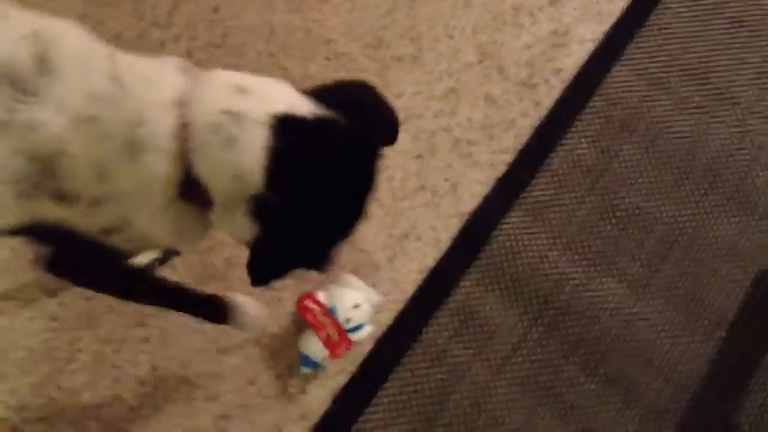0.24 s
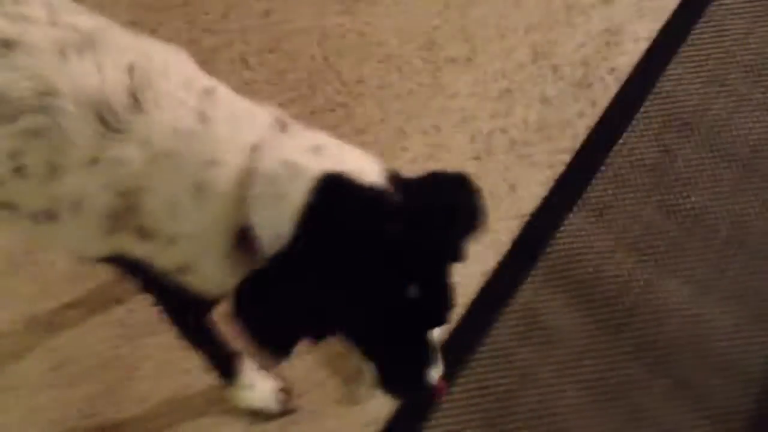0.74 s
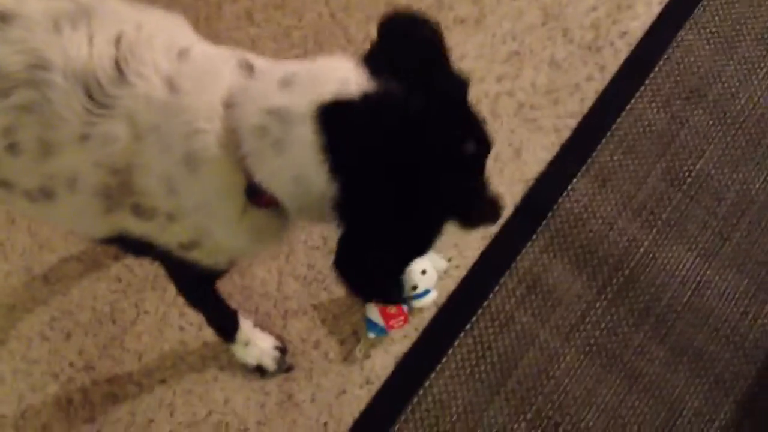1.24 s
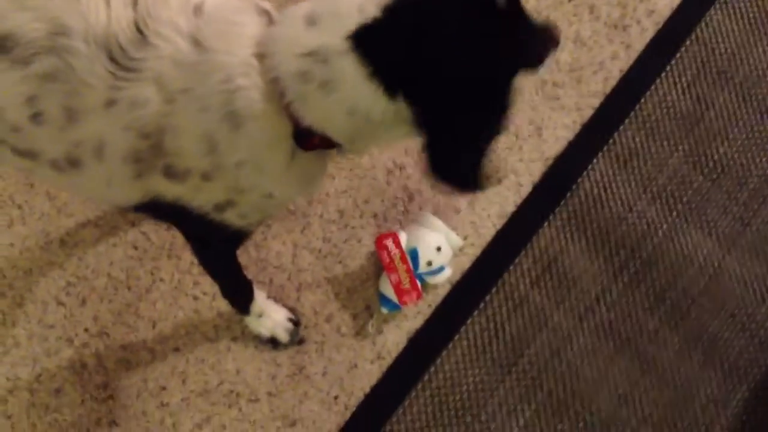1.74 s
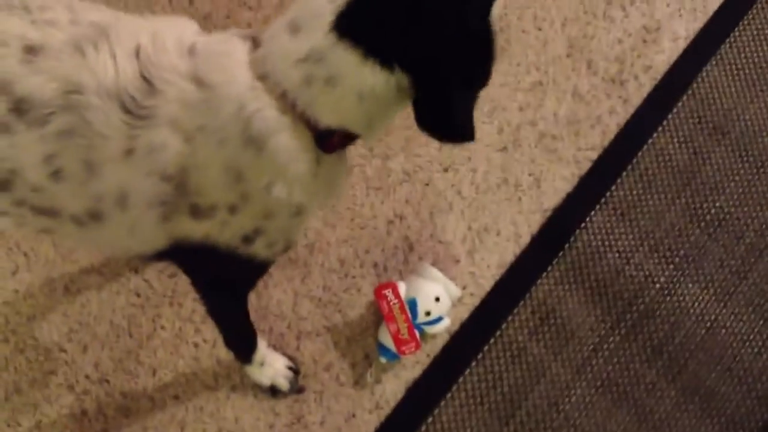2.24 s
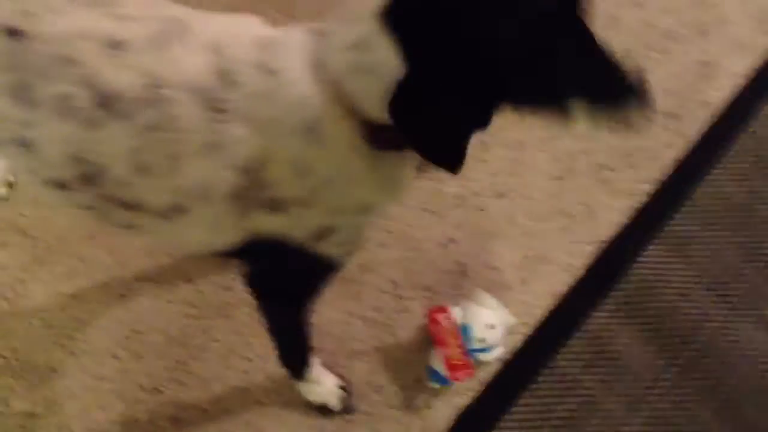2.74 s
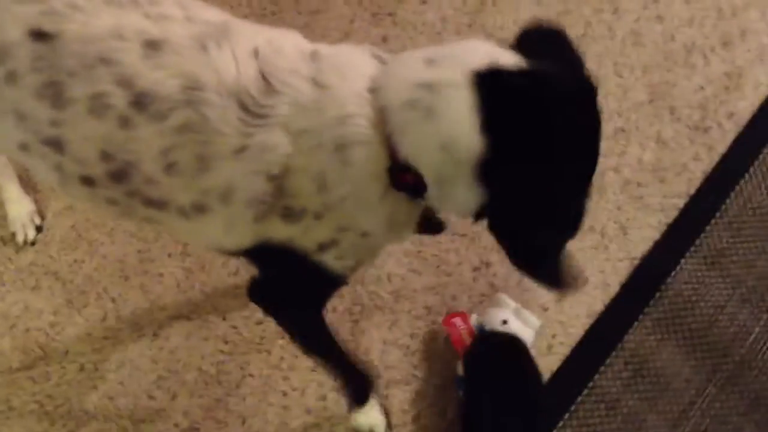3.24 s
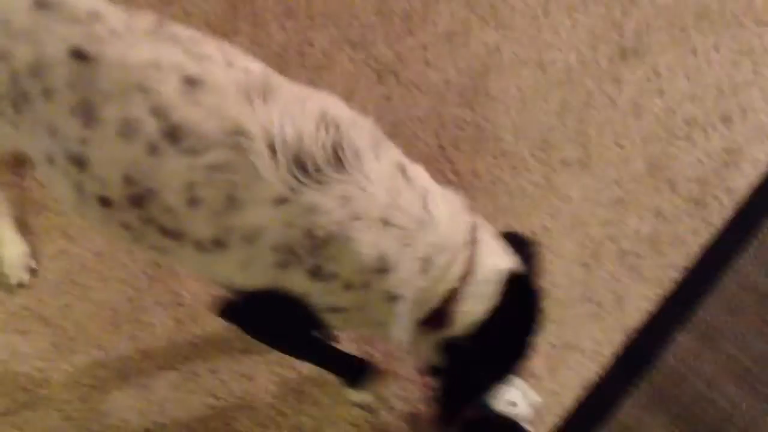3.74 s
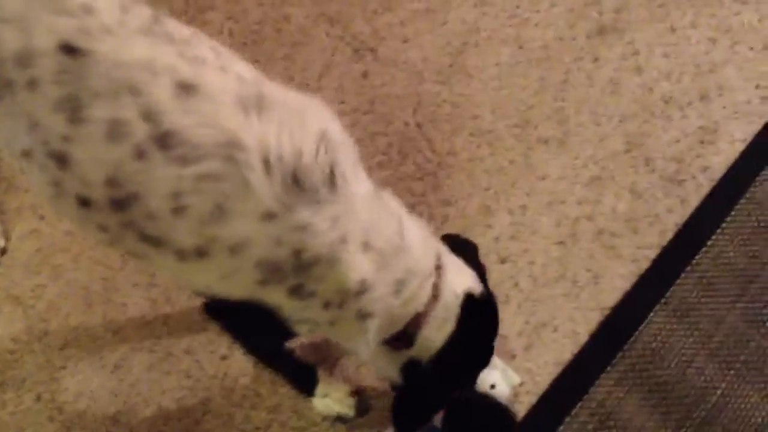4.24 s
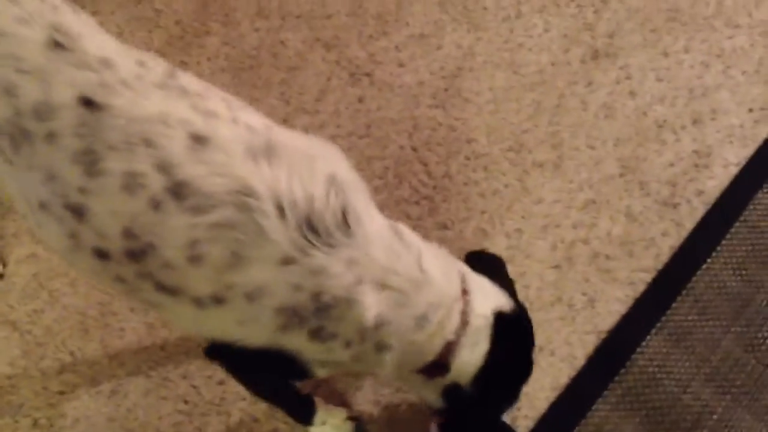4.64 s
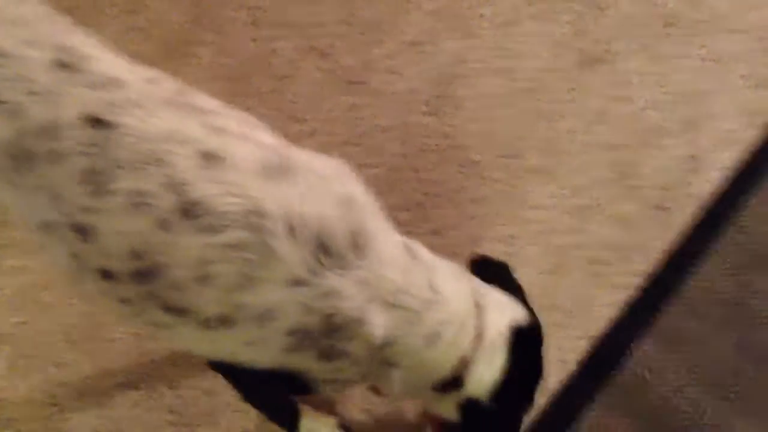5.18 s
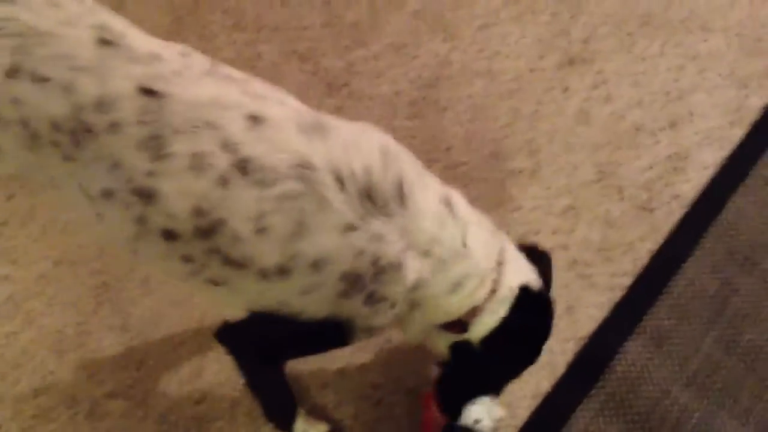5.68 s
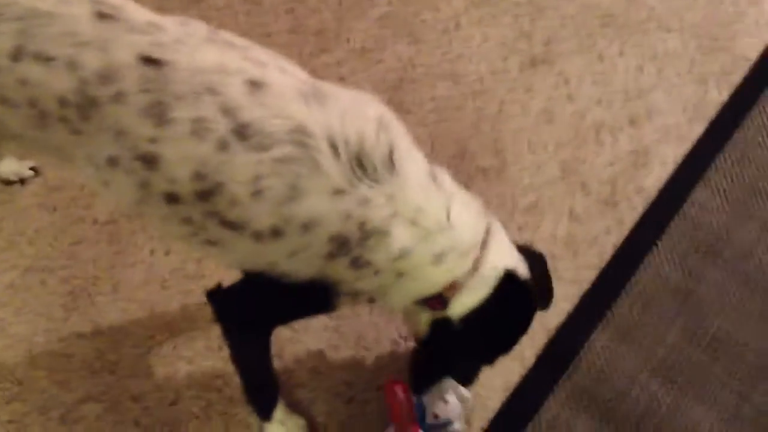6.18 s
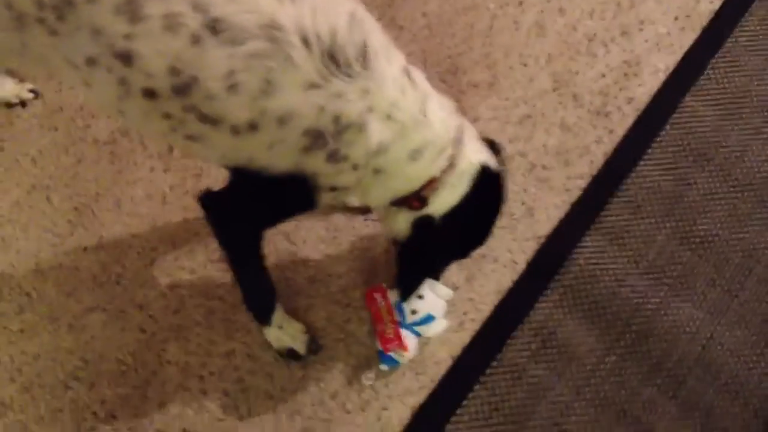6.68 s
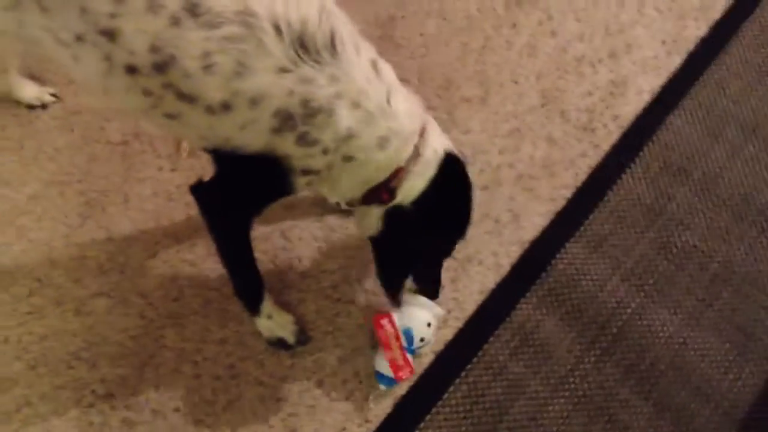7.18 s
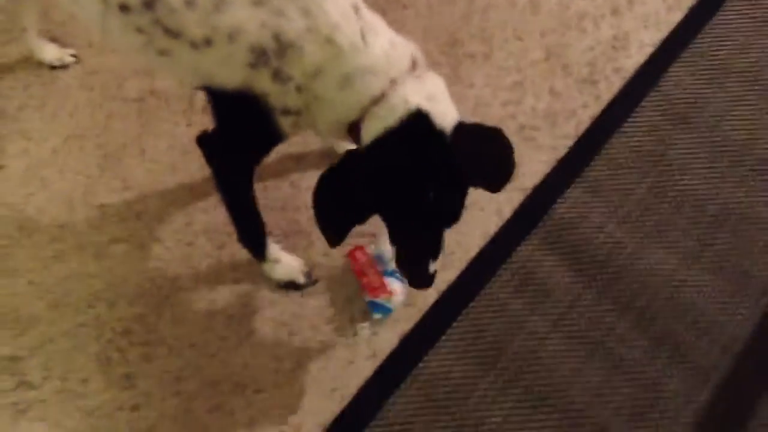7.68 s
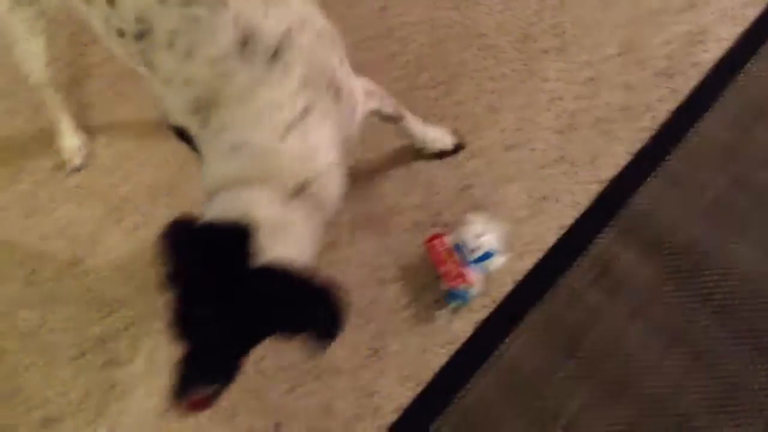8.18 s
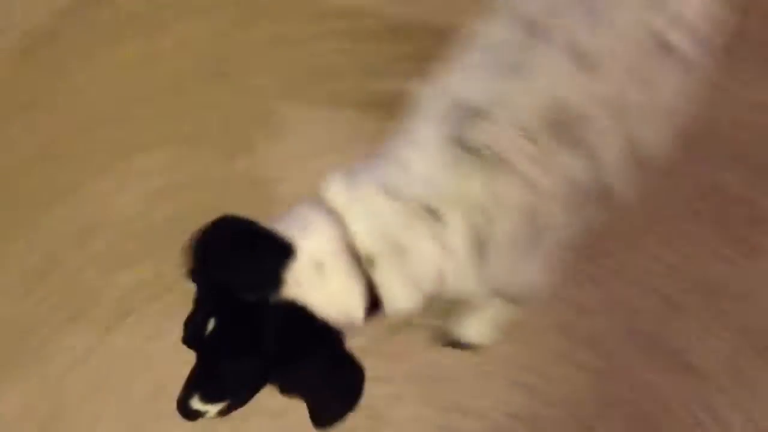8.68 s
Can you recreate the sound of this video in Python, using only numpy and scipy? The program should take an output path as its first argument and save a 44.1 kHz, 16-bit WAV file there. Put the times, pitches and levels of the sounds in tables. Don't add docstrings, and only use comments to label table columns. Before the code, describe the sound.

The tail of a toy squeal fades over a faint low appliance drone. Collar tags clink and a dog close by whines, then gives several high, downward-sliding yelps, each led by a thin nasal whistle, with light panting. Next it bites a squeaky toy in a rapid, uneven run of bright squeals. Softer, breathy whimpers end it. Small carpeted room, phone about a metre away, brief room ring.

```python
import sys
import numpy as np
from scipy import signal
from scipy.fft import rfft, irfft
from scipy.io import wavfile
from scipy.ndimage import uniform_filter1d

SR = 44100
rng = np.random.default_rng(int(sys.argv[2]) if len(sys.argv) > 2 else 0)


def store_pcm(level_fs):
    pcm = np.round(np.clip(level_fs, -1, 1) * 32767).astype(np.int16)
    wavfile.write(sys.argv[1], SR, np.atleast_2d(pcm).T)


def boost_factor(decibels):
    exponent = np.asarray(decibels, float) / 20
    return 10 ** exponent


N = 393372
TOP_HZ = 15500
SHARES = np.linspace(0, 1, 13)


def unit(x):
    return x / np.sqrt(np.mean(x ** 2))


def colour_db(table, hz):
    f, db = np.transpose(table)
    return np.interp(np.log(np.maximum(hz, 1)), np.log(f), db)


def noise(table):
    spectrum = rfft(rng.standard_normal(N))
    hz = np.arange(len(spectrum)) * SR / N
    return unit(irfft(spectrum * boost_factor(colour_db(table, hz)), N))


def tint(x, table):
    hz = np.arange(N // 2 + 1) * SR / N
    return irfft(rfft(x) * boost_factor(colour_db(table, hz)), N)


def flutter(rate):
    k = int(SR / rate)
    return unit(uniform_filter1d(uniform_filter1d(rng.standard_normal(N), k), k))


def swells(table, lean=0.94):
    out = np.zeros(N)
    for start, end, db in table:
        at = np.arange(int(start * SR) + 1, int(end * SR))
        share = (at / SR - start) / (end - start)
        out[at] += boost_factor(db) * np.sin(np.pi * share ** lean) ** 2
    return out


def play(table, rise_s, fall_s, round_s=0.002):
    s, *columns = np.transpose(table)
    at = np.arange(max(int(s[0] * SR), 0), min(int(s[-1] * SR), N))
    t = at / SR
    gate = np.clip(np.minimum((t - s[0]) / rise_s, (s[-1] - t) / fall_s), 0, 1)
    return at, [uniform_filter1d(np.interp(t, s, c), int(round_s * SR)) for c in columns], gate


def cycle(hz):
    return 2 * np.pi * np.cumsum(hz) / SR


def building(at, late_db, builds_s):
    return late_db * np.exp((at[0] - at) / SR / builds_s)


# f/Hz, level/dB per Hz
HOUSE_COLOUR = [(15, -91.5), (25, -38.5), (50, -33.5), (79, -23), (99, -18.5), (125, -6), (198, -8.5),
                (227, 0.5), (266, -5), (305, -6.5), (378, -11.5), (522, -14), (917, -17), (1950, -21),
                (3430, -22.5), (8550, -25.5), (10500, -30), (13000, -26), (15400, -28)]
# f/Hz, width/Hz, level/dB
DRONE = [(154, 13, -73.5), (176.5, 21, -71), (238.5, 48, -79)]


def floor(near, duck_db=-8, loud_db=-38):
    t = np.arange(N) / SR
    drone = 0
    for hz, width, db in DRONE:
        drone = drone + boost_factor(db) * flutter(width) * np.sqrt(2) * np.sin(2 * np.pi * hz * t)
    house = boost_factor(-64.5 + 0.28 * flutter(4.5)) * noise(HOUSE_COLOUR)
    power = uniform_filter1d(near ** 2, int(0.023 * SR))
    lows = signal.sosfiltfilt(signal.butter(2, 500, fs=SR, output="sos"), house)
    duck = boost_factor(duck_db * power / (power + boost_factor(2 * loud_db)))
    return lows + (house - lows) * duck + drone


# f/Hz, level/dB
REFILL_COLOUR = [(500, -34), (900, 8.5), (1200, -4.5), (2410, -7), (3720, -3), (4880, -4), (5900, -12.5),
                 (7530, 1.5), (10400, -6), (12200, -20), (15400, -20)]
# f/Hz, level/dB
SQUEEZE_COLOUR = [(500, -28), (900, -5), (1200, -12.5), (2350, -15), (3370, -9.5), (4300, -3.5), (4950, -7),
                  (5600, -5), (6100, 1.5), (6800, 2), (7900, -6.5), (9900, -14.5), (12200, -26.5),
                  (15400, -34)]


def earlier_squeals():
    t, pitch_hz = np.arange(N) / SR, 1195
    ring = 0
    for k in range(1, 10):
        level = boost_factor(colour_db(REFILL_COLOUR, k * pitch_hz))
        ring = ring + level * flutter(60 + 24 * k) * np.sin(2 * np.pi * k * pitch_hz * t)
    wash = boost_factor(-37.5 - 130 * t) * noise(SQUEEZE_COLOUR)
    return boost_factor(-40 - 170 * t) * unit(ring) + wash


def reed(strokes, colour, hiss, jitter, rasp_db, hiss_db, slip, sag=.17, dimming=1.1):
    out, wobble, air = np.zeros(N), flutter(90), noise(hiss)
    rasp = [flutter(230) for _ in range(4)]
    for stroke in strokes:
        at, (hz, db), gate = play(stroke, 0.0032, 0.022, 0.013)
        sagging = 1 - sag * (1 - gate) * (at > at.mean())
        phase = cycle(hz * sagging * (1 + jitter * wobble[at]))
        phase = phase + slip * (hz / 1130.0) ** 2 * rasp[0][at[::-1]]
        tone = 0
        for k in range(1, 17):
            uneven_db = rasp_db * min(k / 8.3, 1) ** 2 * rasp[k % 4][at] * (hz / 1500.0) ** .6
            level = boost_factor(colour_db(colour, k * hz) + uneven_db) * (k * hz < TOP_HZ)
            level = level * gate ** (dimming * (k - 1))
            tone = tone + level * np.cos(k * phase + 0.23 * k * k)
        puffs = boost_factor(hiss_db) * air[at] * (1 + np.cos(phase))
        out[at] += gate * boost_factor(db) * (unit(tone) + puffs)
    return out


def refill(start_s, length_s, top_hz, last_hz, db, scoop_hz=82, rise_s=.034, db_per_hz=0.1028):
    s = length_s * SHARES
    under_hz = scoop_hz * np.clip(1 - s / rise_s, 0, 1)
    fading = np.clip((s - rise_s) / (length_s - rise_s), 0, 1) ** 1.9
    under_hz = under_hz + (top_hz - last_hz) * fading
    return np.transpose([start_s + s, top_hz - under_hz, db - db_per_hz * under_hz])


# start t/s, length/s, top f/Hz, last f/Hz, level at the top/dB
REFILLS = [
    (-.07, 0.19, 1239, 869, -26),
    (3.697, 0.099, 1176, 1068, -32.5),
    (3.919, 0.16, 1200, 980, -30.5),
    (4.307, 0.23, 1236, 937, -26.5),
    (4.978, 0.058, 1125, 1017, -34),
    (5.117, 0.054, 1047, 1000, -46),
    (5.291, 0.05, 1143, 1020, -34.5),
    (5.439, 0.048, 1180, 1070, -32.5),
    (6.0, 0.265, 1255, 960, -25.5),
]
# f/Hz, level/dB
SUCK_COLOUR = [(900, -26), (1600, -6), (2300, -17), (4200, -15), (6800, 2), (9500, -14), (15400, -21)]


def toy_refills():
    return reed([refill(*row) for row in REFILLS], REFILL_COLOUR, SUCK_COLOUR,
                jitter=0.0023, rasp_db=5.0, hiss_db=-24, slip=0.03)


# t/s, peak level/dB, rattle level/dB
CLINKS = [(0.1894, -47, -3), (0.3046, -55, -4), (0.389, -62, -7), (0.773, -49.5, -5), (1.038, -42, -6.5),
          (1.111, -39, -9), (1.4053, -63, 4), (1.6157, -38, -17), (1.732, -51.5, -8), (1.826, -49, -9),
          (2.329, -45.5, -2), (2.723, -36.5, -11), (2.904, -52, -4), (2.976, -54, -15), (3.055, -46, -19),
          (3.135, -57.5, 2.5), (3.365, -51.5, -22), (4.7591, -53.5, -24.5), (7.05, -56.5, -21),
          (7.6662, -55, -5), (8.447, -42.5, -27), (8.8995, -46, -10)]
# f/Hz, level/dB, t60/s
TAGS = [(6630, -12.5, 0.11), (8940, 1, 0.045), (10200, -5, 0.064), (12030, -6.5, 0.12), (14600, -15, 0.06),
        (7570, 0.5, 0.06), (13340, -15, .04)]
# f/Hz, level/dB
TICK_COLOUR = [(3000, -32), (6000, 3), (8000, 7.5), (12000, -5), (15000, -10)]


def tags():
    out, rattle, t = np.zeros(N + SR), np.zeros(N + SR), np.arange(SR // 4) / SR
    chance = rng.standard_normal((len(CLINKS), len(TAGS)))
    for (s, db, tick_db), mix in zip(CLINKS, chance):
        ring = 0
        for (f, g, t60), c in zip(TAGS, mix):
            mode = np.sin(2 * np.pi * f * (1 + 0.0031 * c) * t)
            ring = ring + boost_factor(g + 3.0 * c) * mode * boost_factor(-60 * t / t60)
        tick = np.exp(-t / 0.0095) * (1 - np.exp(-t / 0.0019))
        out[int(s * SR):][:len(t)] += boost_factor(db - 10) * ring * (1 - np.exp(-t / .005))
        rattle[int(s * SR):][:len(t)] += boost_factor(db + tick_db) * tick
    knocks = out[:N] * boost_factor(5.5 * flutter(330)) + rattle[:N] * noise(TICK_COLOUR)
    rebound = np.roll(knocks, int(.012 * SR)) * (np.arange(N) > SR // 10)
    return knocks + boost_factor(-3.5) * rebound


# from t/s, to t/s, level/dB
PANTS = [
    (1.25, 1.4, -101),
    (1.7, 1.86, -69),
    (2.17, 2.33, -61.5),
    (2.7, 2.92, -62.5),
    (6.55, 6.72, -73),
    (7.5, 7.62, -90),
    (.22, .34, -62),
    (.86, 1.1, -64.5),
    (8.1, 8.23, -57),
    (8.22, 8.48, -58.5),
]
# f/Hz, level/dB
PANT_COLOUR = [(300, -2), (600, 10.5), (1000, 7), (1900, 3), (2600, 2.5), (3300, -42), (8000, -35),
               (15000, -25)]


def pants():
    return swells(PANTS) * boost_factor(2.2 * flutter(40)) * noise(PANT_COLOUR)


# t/s, peak level/dB
SCUFFS = [
    (0.446, -71),
    (0.619, -75),
    (0.98, -50),
    (1.095, -52.5),
    (6.617, -65),
    (7.438, -65),
    (7.544, -71),
    (3.134, -52.5),
]


def scuffs(decay_s=0.0042):
    out, t = np.zeros(N + SR), np.arange(SR // 10) / SR
    for s, db in SCUFFS:
        out[int(s * SR):][:len(t)] += boost_factor(db + 3.0) * np.exp(-t / decay_s)
    return out[:N] * noise([(200, -22.0), (700, -7.5), (2500, -5.0), (6000, -32.0), (12000, -30.5)])


def whistle(start_s, length_s, from_hz, to_hz, db, settles_s=0.02097):
    swell_db = np.interp(SHARES, [0, 0.32, 1], [-7, 0, -19])
    s = length_s * SHARES
    hz = to_hz + (from_hz - to_hz) * np.exp(-s / settles_s)
    return np.transpose([start_s + s, hz, db + swell_db])


# start t/s, length/s, from f/Hz, to f/Hz, level/dB
PINCHED = [
    (0.779, 0.15, 3640, 3544, -60),
    (1.395, 0.18, 3180, 3470, -50.5),
    (1.856, 0.21, 3040, 3296, -54),
    (2.331, 0.19, 2930, 3300, -50.5),
    (2.82, 0.186, 3003, 3275, -56.5),
    (7.701, 0.15, 3524, 3393, -54),
]
# start t/s, length/s, from f/Hz, to f/Hz, level/dB
LOOSE = [(2.93, 0.268, 3290, 3290, -65), (6.51, 0.059, 3400, 3300, -61.5), (6.74, 0.13, 3450, 3330, -57.5),
         (7.19, 0.055, 3600, 3500, -52.5), (7.788, .03, 4340, 4180, -47), (8.125, 0.056, 3460, 3350, -56),
         (8.2, 0.087, 3500, 3620, -53.5), (8.275, 0.07, 3500, 3580, -59), (8.31, 0.088, 3560, 3650, -49),
         (8.375, 0.06, 3700, 3760, -54), (8.29, 0.11, 4200, 4380, -61), (.8, 0.11, 5440, 5330, -73),
         (.9, .12, 5460, 5620, -72.5)]
# t/s, f/Hz, level/dB
ARCHED_WHISTLE = [(.875, 3894, -74), (.93, 3910, -70), (.973, 4100, -63.5), (1.016, 4006, -52),
                  (1.07, 3940, -58.5), (1.151, 3710, -61), (1.17, 3660, -74)]


def whistles(jitter=0.0048, fourth_db=-27, nose_hz=4120, nose_db=-24):
    out, wobble, shake = np.zeros(N), flutter(90), flutter(79)
    cavity = flutter(120) * np.sin(cycle(np.full(N, nose_hz)))
    calls = [(whistle(*row), 4.5) for row in PINCHED]
    calls += [(whistle(*row), -17) for row in LOOSE]
    calls += [(ARCHED_WHISTLE, -11.5)]
    for call, octave_db in calls:
        at, (hz, first_db), gate = play(call, 0.0067, 0.0069, 0.012)
        phase = cycle(hz * (1 + jitter * wobble[at]))
        lower = np.sin(phase) + boost_factor(nose_db) * cavity[at]
        highest = np.sin(3 * phase) + np.sin(4 * phase) * (4 * hz < TOP_HZ)
        upper = np.sin(2 * phase) + boost_factor(fourth_db) * highest
        lower_db = first_db + 3.5 * wobble[at[::-1]]
        upper_db = first_db + octave_db + 3.0 * shake[at] + building(at, -14, 0.0198)
        out[at] += gate * np.sqrt(2) * (boost_factor(lower_db) * lower + boost_factor(upper_db) * upper)
    return out


# from t/s, to t/s, level/dB
NASAL_AIR = [
    (.78, 1.06, -67.5),
    (1.4, 1.52, -71.5),
    (2.33, 2.47, -68),
    (2.83, 3.0, -66.5),
    (6.8, 7.06, -73),
    (7.71, 7.84, -65.5),
    (8.0, 8.12, -65),
    (8.24, 8.46, -63),
]
# f/Hz, level/dB
NASAL_COLOUR = [(2500, -25), (3600, -5), (4400, 1.5), (5500, -4), (6500, -10.5), (8000, -11),
                (11500, -12.5), (15000, -16)]


def nasal_air():
    return swells(NASAL_AIR, lean=.7) * noise(NASAL_COLOUR)


# from t/s, to t/s, level/dB
BREATHS = [
    (.9, 1.14, -71),
    (1.1, 1.22, -59.5),
    (1.5, 1.68, -59.5),
    (1.96, 2.15, -55.5),
    (2.45, 2.68, -54),
    (2.9, 3.2, -62.5),
    (7.28, 7.52, -64),
    (7.76, 8.12, -62.5),
    (8.13, 8.22, -69),
    (8.25, 8.48, -56.5),
]
# f/Hz, level/dB
BREATH_COLOUR = [(300, -19), (600, -7), (1100, -5), (2200, -9.5), (3000, -12.5), (4200, -14), (7500, -8.5),
                 (10000, -24.5), (15000, -39.5)]


def call_breath(shake, patchy):
    return swells(BREATHS, lean=0.81) * noise(BREATH_COLOUR) * boost_factor(2.5 * shake + 2.2 * patchy)


# share of length, share of slide still to go, level/dB
YELP_COURSE = [(0, 1, -12), (.08, 0.94, -4), (.25, .8, -6), (.45, .63, -14.5), (.65, .38, -5),
               (.86, .15, 0.5), (1, 0.012, -14.5)]


def yelp(start_s, length_s, from_hz, to_hz, db):
    share, to_go, course_db = np.transpose(YELP_COURSE)
    return np.transpose([start_s + length_s * share, to_hz + (from_hz - to_hz) * to_go, db + course_db])


def pip(start_s, length_s, hz, db, sag_hz_per_s=505, edge_db=-5.5):
    sagging_hz = hz - sag_hz_per_s * length_s * (SHARES - .5)
    return np.transpose([start_s + length_s * SHARES, sagging_hz, db + edge_db * (2 * SHARES - 1) ** 2])


# t/s, f/Hz, level/dB
LONG_WHINES = [
    [(.862, 877, -50), (.885, 768.6, -37), (.92, 793.5, -30), (.983, 817, -33), (1.01, 805, -26),
     (1.034, 804.5, -19.5), (1.05, 809, -36), (1.065, 778, -29.5), (1.105, 750, -41.5)],
    [(1.1, 763, -48), (1.121, 781, -31.5), (1.136, 759, -40), (1.155, 700, -36), (1.172, 544, -34),
     (1.195, 487, -50)],
    [(2.912, 790, -45), (2.925, 739, -38), (2.943, 610, -45.5), (2.98, 601, -47.5), (3.005, 571, -42),
     (3.06, 563.6, -36.5), (3.078, 560, -43.5), (3.1, 551, -38.5), (3.2, 525, -58.5)],
    [(4.865, 468.5, -48), (4.889, 522, -39), (4.913, 570, -34), (5.031, 515, -51), (5.06, 445, -41)],
    [(7.2, 734, -62), (7.244, 670, -43), (7.258, 645, -34.5), (7.29, 566, -44), (7.344, 489, -40.5),
     (7.402, 423, -45.5), (7.432, 407.3, -51), (7.5, 405, -69)],
    [(7.788, 893, -50), (7.8, 873, -39), (7.83, 728, -36.5), (7.878, 679.6, -39), (7.972, 613.6, -37),
     (8.0, 597, -54), (8.016, 595.4, -42.5), (8.035, 594, -56), (8.1, 602, -54.5)],
    [(8.139, 656, -41), (8.148, 634, -36), (8.175, 629, -33.5), (8.186, 621, -37), (8.194, 617, -52),
     (8.215, 620, -52)],
    [(8.23, 697, -33), (8.238, 691, -38.5), (8.31, 670.5, -38.5), (8.328, 675, -49), (8.35, 719, -32),
     (8.368, 715, -44), (8.398, 706, -51), (8.434, 690, -61), (8.46, 688, -74)],
]
# t/s, f/Hz, level/dB
SHARP_YELP = [(1.495, 1027, -35), (1.514, 933, -25.5), (1.535, 829, -37), (1.565, 740, -41),
              (1.575, 717, -33), (1.59, 671, -38), (1.609, 569.4, -31.5), (1.63, 470, -37.5),
              (1.648, 370, -45)]
# start t/s, length/s, from f/Hz, to f/Hz, level/dB
YELPS = [
    (1.952, 0.17, 945, 434, -28.5),
]
# t/s, f/Hz, level/dB
STEPPED_YELP = [(2.455, 1009, -51), (2.468, 954, -28.5), (2.487, 829, -31), (2.542, 731, -39),
                (2.566, 587, -34), (2.63, 450.3, -33), (2.655, 360, -50)]
# start t/s, length/s, f/Hz, level/dB
PIPS = [
    (6.508, 0.037, 550, -59.5),
    (6.824, 0.0916, 529, -52),
]
# from t/s, to t/s, in-between lines level/dB
HALVING = [
    (0.916, 0.989, -57),
    (8.229, 8.247, -43),
    (8.285, 8.32, -45),
    (8.327, 8.365, -35.5),
    (8.38, 8.45, -66),
]
# from t/s, to t/s, scatter/dB
BREAKS = [
    (1.13, 1.21, 13),
    (1.59, 1.66, 11),
    (2.06, 2.13, 11),
    (2.59, 2.67, 11),
    (8.27, 8.47, 10),
]
# t/s, second level/dB, press level/dB, open level/dB
MUZZLE = [(.9, -3, 0, -7), (1.1, -10, -1, -3.5), (1.171, 12, 4, -2.5), (1.5, -3, -1, -8),
          (1.57, 2, -1.5, -5), (1.63, -2, -2.5, -4), (1.97, -8, -2.5, -4), (2.04, 3, -8.5, -1),
          (2.1, 5, 0, -8), (2.47, -3, -4, -4), (2.55, 3.5, -2, 1.5), (2.63, -5, -3.5, -6.5),
          (2.94, -4.5, -1.5, -3), (3.05, -5.5, -10, -4), (3.15, 0.5, -3, -2), (4.95, 1.5, 1.5, -2),
          (6.7, -18, -18, -4), (7.0, -22, -14.5, -2), (7.23, -13, -8.5, -5), (7.351, -13.5, -4, -5),
          (7.45, -6.5, -4, -7), (7.801, -7, -6.5, 8), (7.86, -6, -3, 6.5), (8.0, 0, -0.5, 11.5),
          (8.06, -7, -13, 9.5), (8.13, -10, 1, 5), (8.17, -11, -2, -3), (8.22, -15, -8, 2),
          (8.256, 9.5, 12, 1.5), (8.3, 5.5, 4.5, 0), (8.35, -1.5, -4.5, 7), (8.4, -6, -3.5, 6)]
# f/Hz, level/dB
SECOND = [(800, 4.5), (1000, -7), (1150, -19), (1400, -13.5), (1600, -21.5), (1950, -37.5)]
# f/Hz, level/dB
THROAT = [(900, -35), (1350, 4), (1700, 8), (2100, 2), (2600, -0.5), (3300, -5.5), (4250, -1), (5100, -17),
          (6500, -14.5), (7500, -13.5), (9000, -39.5)]


def whines(jitter=0.0045, shimmer_db=1.6):
    out, wobble, shake = np.zeros(N), flutter(81.7), flutter(92)
    half = swells(HALVING) * boost_factor(2.0 * flutter(90))
    rough_db = swells(BREAKS) * np.clip(flutter(220), -2.5, 1)
    patchy = [flutter(31.5) for _ in range(3)]
    s, *controls = np.transpose(MUZZLE)
    second_db, press_db, open_db = (np.interp(np.arange(N) / SR, s, c) for c in controls)
    calls = LONG_WHINES + [STEPPED_YELP, SHARP_YELP]
    calls = calls + [yelp(*row) for row in YELPS] + [pip(*row) for row in PIPS]
    for call in calls:
        at, (hz, first_db), gate = play(call, 0.005, .012)
        phase = cycle(hz * (1 + jitter * wobble[at]))
        tone = boost_factor(first_db) * np.sin(phase)
        tone += boost_factor(first_db + second_db[at] + colour_db(SECOND, 2 * hz)) * np.sin(2 * phase)
        drive_db = -66 + press_db[at] + 0.4 * (first_db + 40) + building(at, -8.5, 0.0069)
        for k in range(3, 15):
            opened_db = np.clip((k * hz - 2450) / 500, 0, 1) * open_db[at]
            partial_db = drive_db + 4.5 * patchy[k % 3][at] + opened_db + colour_db(THROAT, k * hz)
            tone += boost_factor(partial_db) * np.sin(k * phase + k * k)
        for k, db in enumerate([-16.5, -2.0, -21.5, -33.0]):
            tone += half[at] * boost_factor(db) * np.sin((k + .5) * phase)
        out[at] += gate * np.sqrt(2) * tone * boost_factor(shimmer_db * shake[at] + rough_db[at])
    return out + call_breath(shake, patchy[0])


def squeeze(start_s, length_s, top_hz, last_hz, db):
    peak = min(.046 / length_s, .55)
    rising = np.clip(1 - SHARES / peak, 0, 1) ** 1.5
    falling = np.clip((SHARES - peak) / (1 - peak), 0, 1) ** 1.4
    speaks_hz = min(981, .95 * top_hz)
    hz = top_hz - (top_hz - speaks_hz) * rising - (top_hz - last_hz) * falling
    return np.transpose([start_s + length_s * SHARES, hz, db - 7 * rising - 12.5 * falling])


# start t/s, length/s, top f/Hz, last f/Hz, level at the top/dB
SQUEEZES = [(3.241, 0.053, 948, 857, -36.5), (3.556, 0.11, 1110, 842, -24), (3.802, 0.1, 1155, 859, -23),
            (4.087, 0.11, 1422, 828, -19.5), (4.212, 0.094, 1032, 950, -29),
            (4.851, 0.11, 1084, 847, -26.5), (5.057, 0.067, 1033, 881, -28), (5.207, 0.067, 1076, 835, -27),
            (5.37, 0.035, 984, 824, -34.5), (5.501, 0.087, 1131, 864, -23.5),
            (5.649, 0.061, 1029, 884, -26.5), (5.796, 0.05, 1016, 870, -29.5),
            (5.902, .095, 1176, 901, -21.5)]
# f/Hz, level/dB
HISS_COLOUR = [(900, -32), (1600, -28), (2300, -21.5), (4200, -17), (6800, 3.5), (9500, -16), (12500, -15),
               (15400, -20.5)]


def toy_squeezes():
    return reed([squeeze(*row) for row in SQUEEZES], SQUEEZE_COLOUR, HISS_COLOUR,
                jitter=0.0071, rasp_db=4.5, hiss_db=-13.5, slip=.07)


# f/Hz, t60/s, level/dB
ROOM = [(373, 0.46, -10.5), (1200, 0.41, -1.5), (3500, 0.44, -2), (6560, 0.38, 1.5), (11700, 0.18, -1.5)]


def room(x, first_s=0.006):
    t, hz = np.arange(SR) / SR, np.arange(SR // 2 + 1)
    spectrum, centres = rfft(rng.standard_normal(SR)), np.log(np.array(ROOM)[:, 0])
    tail = 0
    for k, (_, t60, db) in enumerate(ROOM):
        share = np.interp(np.log(hz + 1), centres, np.eye(len(ROOM))[k])
        band = irfft(spectrum * share, SR)
        fall = boost_factor(-60 * t / t60) * (t > first_s)
        tail = tail + boost_factor(db) * band * fall / np.sqrt(np.sum(fall ** 2))
    return signal.fftconvolve(x, tail)[:N]


# f/Hz, level/dB
JAW_SHADE = [(2500, 0.5), (4500, -2), (6500, -4), (12000, -3.5)]
# f/Hz, level/dB
TOY_WET = [(800, -2.5), (1500, -5.5), (3000, -4.5), (4500, -1.5), (7000, -2), (12000, -1)]


def scene():
    out, back = toy_squeezes(), toy_refills()
    nose = whistles() + nasal_air()
    close = whines() + pants() + nose + tags() + scuffs()
    toy = boost_factor(-3.0) * (tint(out, JAW_SHADE) + back)
    echoes = room(boost_factor(-2.5) * (close - 0.32 * nose) + tint(boost_factor(1.5) * out + back, TOY_WET))
    near = close + toy + echoes + earlier_squeals()
    near = signal.sosfilt(signal.butter(4, 260, "high", fs=SR, output="sos"), near)
    return (near + floor(near))[None]


def thin(x, size=8, under_db=29, cut_db=-15, from_hz=1150):
    hz, _, z = signal.stft(x, SR, nperseg=2048, noverlap=1536)
    power = np.mean(np.abs(z[:-1].reshape(-1, size, z.shape[1])) ** 2, axis=1)
    db = 10 * np.log10(power + 1e-20)
    below_db = np.max([np.roll(db, k + 1, axis=0) + reach for k, reach in enumerate([0, 0, -5])], axis=0)
    below_db += 6 * np.log2(np.maximum(hz[:-1:size, None] / from_hz, 1))
    masked = np.repeat(db < below_db - under_db, size, axis=0) & (hz[:-1, None] > from_hz)
    gain = np.vstack([np.where(masked, boost_factor(cut_db), 1), np.ones((1, z.shape[1]))])
    return signal.istft(z * gain, SR, nperseg=2048, noverlap=1536)[1][:N]


def low_pass(x):
    return signal.sosfilt(signal.butter(12, 15400, fs=SR, output="sos"), x)


def record(dry):
    mix = thin(dry[0])[None]
    return low_pass(mix)


dry = scene()
out = record(dry)
store_pcm(out)
```